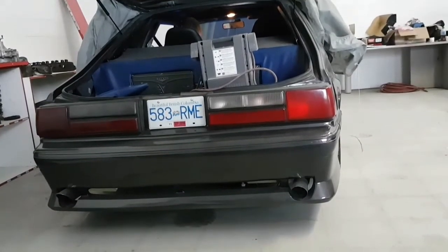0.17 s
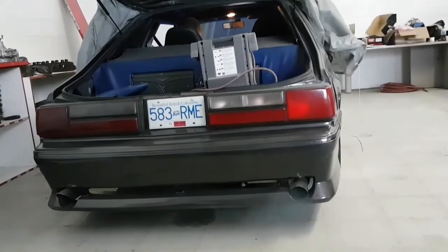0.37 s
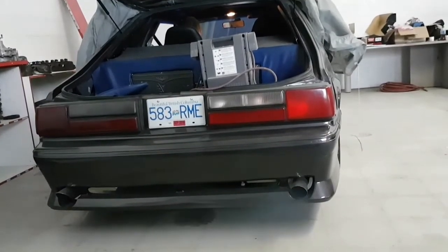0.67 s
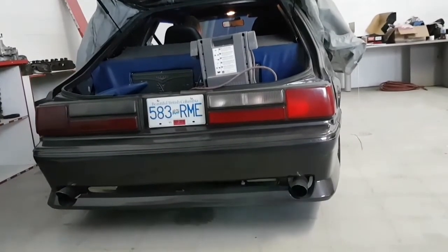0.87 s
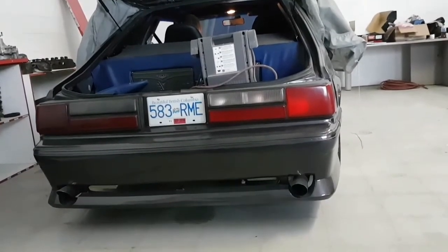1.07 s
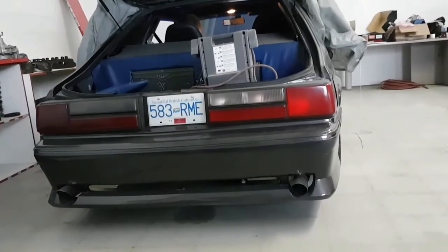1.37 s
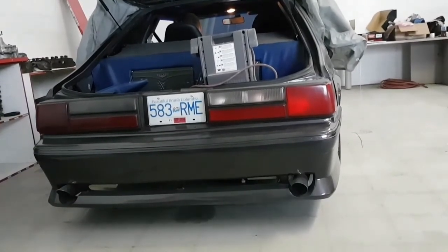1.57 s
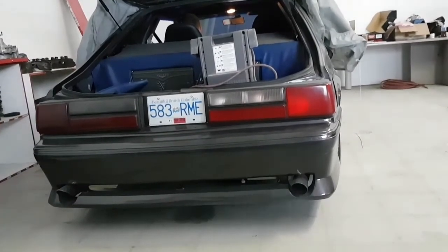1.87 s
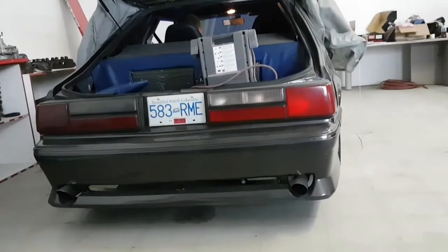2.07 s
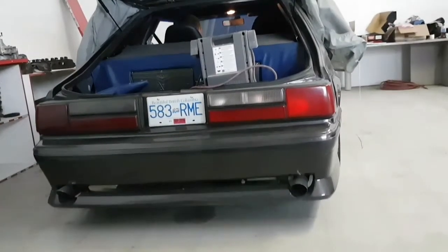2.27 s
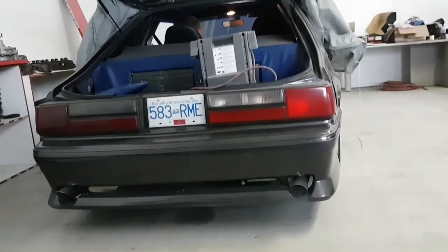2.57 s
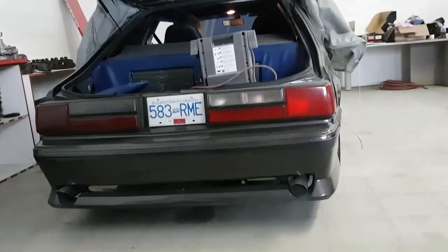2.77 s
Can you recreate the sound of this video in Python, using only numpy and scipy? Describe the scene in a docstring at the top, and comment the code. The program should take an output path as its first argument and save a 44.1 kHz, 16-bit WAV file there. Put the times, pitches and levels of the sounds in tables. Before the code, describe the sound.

V8 car exhaust rumbling at idle in a workshop, one quick throttle blip with belt chirps, then falling back

```python
"""A V8 with twin tailpipes idles in a workshop, heard in stereo from behind; one throttle blip, then a lumpy idle.
Uneven firing pulses and clean engine orders ring the pipes (a deep boom, a bark under load); gas rasps and hisses.
The boom comes almost wholly direct to the microphones; bark, rasp and belt bring more of the room with them.
The throttle opens with a short hiss, the belt chirps around the pick-up, and the running gear whirrs
over the engine bay's steady rush, made of noise bands."""
import sys
import numpy as np
from scipy import signal
from scipy.io import wavfile
from scipy.ndimage import uniform_filter1d

SR = 44100
rng = np.random.default_rng(int(sys.argv[2]) if len(sys.argv) > 2 else 0)


def master_out(mix):
    """Clip the mix to full scale and print it as 16-bit PCM to the path in sys.argv[1]."""
    frames = np.transpose(np.atleast_2d(mix))
    ceiling = np.clip(frames, -1, 1)
    pcm = np.round(ceiling * 32767).astype(np.int16)
    wavfile.write(sys.argv[1], SR, pcm)


N = 129213
T = np.arange(N) / SR   # time, s

# In mode tables, width is that of one of two equal stages and level is relative within the group.
# Level curves are followed over time, with the trim (_TRIM_DB) added.

# engine speed: [t/s, four-stroke cycles per s]
ENGINE_SPEED = [(0, 13.86), (.2, 12.36), (.42, 12.34), (.5, 12.5), (.57, 16.6), (.64, 22), (.72, 30),
                (.78, 33.9), (.83, 36.2), (.9, 34.1), (1.0, 32.2), (1.09, 29.8), (1.22, 28.6), (1.33, 27.6),
                (1.45, 23.7), (1.62, 21.9), (1.8, 19.3), (1.98, 15.5), (2.16, 14.7), (2.34, 13.1),
                (2.55, 12.47), (2.93, 10.17)]
# strength of each cylinder's pulse, in firing order: [level/dB]
CYLINDER_DB = [2, -0.5, -3.5, 1, -7, 1, -1, -2]
CYLINDERS = len(CYLINDER_DB)
FIRING_JITTER, FIRING_SPREAD_DB = 0.0064, 5   # standard deviations: share of a cycle, dB
# clean exhaust lines: [multiple of the cycle rate]
ORDER_MULTIPLE = [3, 4, 5, 6, 7, 8, 9, 10, 11, 12, 13, 16, 19, 21, 24, 27, 29, 32]
# their strength against the firing pulses: [level/dB]
ORDER_DB = [-0.5, -5, 0.5, 0.5, -4, 0, -5, -3.5, -4.5, -1.5, -9.5, -12, -6.5, -7.5, -8, -5.5, -10, -10.5]
ORDER_WAVER_DB, WAVER_PER_S = 4.5, 12   # the upper lines swell and fade
BOOM_CLEAN, BARK_CLEAN, RASP_CLEAN = 2, 1.53, 0.17   # gain of clean lines against the pulses

# deep boom of the pipes: [t/s, level/dB]
BOOM_LEVEL = [(0.0, -5), (0.09, -17.5), (0.11, -8.5), (0.18, -15), (0.5, -9.5), (0.57, -5.5), (0.63, -17),
              (0.75, -34), (0.97, -14), (1.16, -10), (1.21, -26), (1.24, -11.5), (1.34, -7), (1.36, -11.5),
              (1.49, -7), (1.53, -14), (1.56, -12.5), (1.8, -5), (1.84, -14), (1.93, -8.5), (2.01, -14),
              (2.16, -9.5), (2.32, -12), (2.35, -5.5), (2.4, -15), (2.52, -9.5), (2.58, -20), (2.78, -13),
              (2.83, -26), (2.87, -10.5), (2.9, -19.5)]
# its wandering centre, as the exhaust lines pass through it: [t/s, f/Hz]
BOOM_CENTRE = [(0, 108.3), (.2, 105.2), (.33, 119.3), (.47, 108), (.56, 123), (.62, 134), (.85, 137.5),
               (1.1, 116.4), (1.331, 124), (1.45, 119), (1.62, 127.6), (1.8, 115.5), (1.93, 107.8),
               (2.03, 123.7), (2.16, 118.3), (2.34, 107), (2.5, 114.8), (2.7, 110.3), (2.93, 119.2)]
BOOM_WIDTH_HZ, BOOM_TRIM_DB = 16.1, -0.5
# thrum, the lowest pipe resonance: [f/Hz, width/Hz, level/dB]
THRUM_MODES = [(60, 51, 0)]
# its level curve: [t/s, level/dB]
THRUM_LEVEL = [(0.0, -30), (0.22, -42), (0.69, -25), (0.77, -42), (0.99, -34), (1.01, -47), (1.48, -27.5),
               (1.78, -42), (1.84, -37), (2.2, -29), (2.24, -45), (2.93, -34.5)]
# drone just above the boom: [f/Hz, width/Hz, level/dB]
DRONE_MODES = [(140.1, 28.6, 3), (163.6, 88, -17.5)]
# its level curve: [t/s, level/dB]
DRONE_LEVEL = [(0.0, -17.5), (0.129, -49), (0.54, -17), (0.6, -10.5), (0.631, -14), (0.87, -12),
               (0.95, -23), (1.18, -18), (1.72, -48.5), (1.949, -18.5), (2.081, -22.5), (2.88, -35.5)]
THRUM_TRIM_DB, DRONE_TRIM_DB = 2, -1.5
# growl under the bark: [f/Hz, width/Hz, level/dB]
GROWL_MODES = [(226.6, 21.9, 0)]
# its level curve: [t/s, level/dB]
GROWL_LEVEL = [(0.0, -28.5), (0.049, -25.5), (0.15, -33.5), (0.18, -31), (0.56, -22), (0.73, -22.5),
               (0.8, -43), (0.901, -16), (1.238, -14.5), (1.31, -24.5), (1.58, -20), (1.631, -25),
               (1.68, -21), (1.84, -26.5), (2.07, -17.5), (2.119, -29), (2.85, -26), (2.88, -33.5)]
# bark: [f/Hz, width/Hz, level/dB]
BARK_MODES = [(265, 37.7, 0)]
# its level curve: [t/s, level/dB]
BARK_LEVEL = [(0.0, -35.5), (0.4, -27), (0.47, -38), (0.5, -23.5), (0.8, -6), (0.85, -18), (1.0, -14),
              (1.04, -20.5), (1.72, -25), (1.75, -36.5), (1.85, -20.5), (2.23, -39), (2.52, -32.5),
              (2.55, -31), (2.64, -25.5), (2.68, -32), (2.77, -30), (2.93, -40)]
# honk above the bark, which speaks under load: [t/s, level/dB]
HONK_LEVEL = [(0.0, -37), (0.031, -43.5), (0.501, -34), (0.66, -11.5), (0.749, -18.5), (0.849, -14),
              (1.599, -32), (2.84, -47.5), (2.88, -47)]
# its moving centre: [t/s, f/Hz]
HONK_CENTRE = [(.6, 369.4), (.68, 389), (.88, 400), (1.03, 377.9), (1.12, 362), (1.4, 385.2)]
GROWL_TRIM_DB, BARK_TRIM_DB, HONK_TRIM_DB, HONK_WIDTH_HZ = 3.5, 2.5, 0.5, 37.3

# gas from the tailpipes: [t/s, rasp level/dB, hiss level/dB before trim]
GAS_LEVELS = [(0.0, -33, -47), (0.35, -33.5, -46.5), (0.46, -35, -40), (0.51, -27, -42), (0.71, -17, -33),
              (1.12, -20, -37), (1.15, -27, -36.5), (1.17, -20, -38.5), (1.3, -23, -37), (1.7, -27.5, -42),
              (1.79, -31.5, -43.5), (1.82, -27.5, -43), (2.41, -36.5, -47), (2.75, -30.5, -48.5),
              (2.89, -34, -51), (2.9, -33.5, -50)]
# upper pipe modes rung by the firings: [f/Hz, width/Hz, level/dB]
RASP_MODES = [(446.9, 24, 7), (500, 54, 4), (567.2, 19.6, 9.5), (622.4, 37, 1.5), (686.5, 45, 1),
              (756.4, 36, -4.5), (857, 70, -6.5), (995, 210, -11)]
# colour of the rasp's noise: [f/Hz, relative level/dB per Hz]
RASP_SPECTRUM = [(250, -14.5), (450, -8), (600, -3.5), (850, -1.5), (1200, -10), (1700, -9), (2400, -36),
                 (4000, -57.5)]
# colour of the hiss: [f/Hz, relative level/dB per Hz]
HISS_SPECTRUM = [(900, 6.5), (1500, 2.5), (2200, 2), (2900, -3.5), (3900, -3), (5000, -11), (6500, -11.5),
                 (8500, -36), (11000, -22.5), (13000, -41.5)]
PUFF_S, PUFF_DEPTH = 0.011, 0.4   # decay time of a puff; share of the rasp noise that it chops
RASP_RING_DB, RASP_NOISE_DB, HISS_TRIM_DB = 0.5, -6, 4.5

# tailpipes blaring while the throttle is open: [f/Hz, width/Hz, level/dB]
BLARE_MODES = [(724, 69, -1), (904, 58, 3.5), (1180, 220, -17.5)]
BLARE_S, BLARE_LENGTH_S, BLARE_DB = 0.714, 0.11, -21
# belt chirps: [centre t/s, length/s, f/Hz, level/dB of the upper tone]
CHIRPS = [(0.459, .026, 2000, -29), (0.532, 0.015, 1860, -24.5), (0.535, 0.028, 1980, -29),
          (0.588, 0.0066, 2120, -24.5), (0.602, 0.02, 1980, -26), (0.645, 0.02, 2093, -22),
          (0.712, 0.026, 2140, -30.5), (0.682, 0.0097, 2156, -23.5), (0.74, .01, 2306, -21),
          (0.771, 0.0064, 2284, -23.5), (0.82, 0.011, 2070, -23.5), (0.983, .17, 2037, -35.5)]
CHIRP_WIDTH_HZ, CHIRP_LOWER_RATIO, CHIRP_LOWER_DB = 160, 0.928, -7.5
THROTTLE_S, THROTTLE_LENGTH_S, THROTTLE_DB = 0.412, 0.023, -40
THROTTLE_HZ, THROTTLE_WIDTH_HZ = 6680, 560
THROTTLE_LEFT_DB = -3   # the right channel gets the opposite
# resonances of the engine's whirr: [f/Hz, width/Hz, level/dB]
WHIRR_MODES = [(968, 120, -0.5), (2053, 386, 3), (2243, 200, -3.5), (3796, 810, -6.5)]
WHIRR_DB, WHIRR_DB_PER_DOUBLING, IDLE_CYCLES_PER_S = -46, 3.5, 11.9
# colour of the engine bay's rush: [f/Hz, relative level/dB per Hz]
BAY_SPECTRUM = [(15, -57), (25, -28), (54, -15), (89, -25.5), (121, -5), (169, -13.5), (225, -10),
                (349, -13), (386, -25.5), (451, -29), (615, -32), (1560, -37), (2360, -41.5), (8360, -70.5),
                (12000, -117), (15600, -147), (22000, -120)]
BAY_DB = -24.5

# likeness of left and right in the noises: [f/Hz, correlation]
STEREO_LIKENESS = [(100, 0.87), (250, 1), (500, 0.28), (1000, 0), (2000, 0.013), (4000, 0), (12000, 0.066)]
# balance of the noises: [f/Hz, left minus right level/dB]
STEREO_BALANCE = [(100, -4), (1000, -0.5), (2000, 0.2), (4000, 0.5), (8000, 3.5), (12000, 21)]
# room sound against direct sound
ROOM_T60_S, BOOM_WET_DB, BARK_WET_DB, RASP_WET_DB, BELT_WET_DB = 0.43, -22.5, -12.5, -7.5, -0.5
CUTOFF_HZ, FADE_OUT_S = 14600, 0.0041


def firings(cycles):
    """One pulse per cylinder and cycle, each cylinder with its own strength, no two firings alike."""
    chance = rng.standard_normal((700, 2))
    k = np.arange(int(cycles[-1] * CYLINDERS))
    times = np.interp(k / CYLINDERS + FIRING_JITTER * chance[k, 0], cycles, T)
    strength_db = np.resize(CYLINDER_DB, len(k)) + FIRING_SPREAD_DB * chance[k, 1]
    pulses = np.zeros(N)
    pulses[np.clip(times * SR, 0, N - 1).astype(int)] = from_db(strength_db)
    return pulses


def engine_orders(cycles, speed):
    """Multiples of the cycle rate as clean lines: all of them steady, and the upper ones wavering."""
    steady, upper = 0, 0
    pulse_scale = 2 * CYLINDERS * speed / SR   # a line's amplitude in a train of unit pulses
    for k, db in zip(ORDER_MULTIPLE, ORDER_DB):
        phase = 2 * np.pi * k * cycles + k * k   # staggered, so that the lines do not peak together
        line = from_db(db) * np.cos(phase) * pulse_scale
        steady = steady + line
        if k >= CYLINDERS - 1:
            upper = upper + line * from_db(ORDER_WAVER_DB * drift(WAVER_PER_S))
    return steady, upper


def exhaust_note(pulses, lines, upper):
    """Pulses and clean lines excite the pipe resonances, some of them with moving centres."""
    low = pulses + BOOM_CLEAN * lines
    high = pulses + BARK_CLEAN * upper
    boom = gliding(low, BOOM_CENTRE, BOOM_WIDTH_HZ, BOOM_LEVEL, BOOM_TRIM_DB)
    boom += voiced(low, THRUM_MODES, THRUM_LEVEL, THRUM_TRIM_DB)
    boom += voiced(low, DRONE_MODES, DRONE_LEVEL, DRONE_TRIM_DB)
    bark = voiced(high, GROWL_MODES, GROWL_LEVEL, GROWL_TRIM_DB)
    bark += voiced(high, BARK_MODES, BARK_LEVEL, BARK_TRIM_DB)
    bark += gliding(high, HONK_CENTRE, HONK_WIDTH_HZ, HONK_LEVEL, HONK_TRIM_DB)
    balance = from_db([[-.35], [.35]])   # left, right
    return workshop(boom, BOOM_WET_DB) * balance + workshop(bark, BARK_WET_DB)


def exhaust_gas(pulses, upper):
    """Each firing rings the upper pipe modes and lets out a puff of rasp and hiss."""
    rasp_db, hiss_db = in_time(GAS_LEVELS)
    puffs = signal.lfilter([1], [1, -np.exp(-1 / (PUFF_S * SR))], pulses + 1e-18)
    puffs = evened(puffs, 0.065)
    turbulence = 0.098 * puffs * rng.standard_normal(N)
    ring = evened(pipe(pulses + RASP_CLEAN * upper + turbulence, RASP_MODES), 0.024)
    chop = rms_one(1 - PUFF_DEPTH + PUFF_DEPTH * puffs)
    rasp = from_db(RASP_RING_DB) * workshop(ring, RASP_WET_DB)
    rasp = rasp + from_db(RASP_NOISE_DB) * chop * stereo_noise(RASP_SPECTRUM)
    hiss = rms_one(1 + 1.4 * puffs) * stereo_noise(HISS_SPECTRUM)
    return from_db(rasp_db) * rasp + from_db(hiss_db + HISS_TRIM_DB) * hiss


def blare(pulses):
    """Firings under load ring the tailpipes, in one bell-shaped swell."""
    ring = evened(pipe(pulses, BLARE_MODES), .04)
    return workshop(from_db(BLARE_DB) * swell(BLARE_S, BLARE_LENGTH_S) * ring, wet_db=-4)


def belt():
    """The drive belt's short two-toned squeals, each tone a narrow band of noise."""
    chirps = 0
    for s, length_s, hz, db in CHIRPS:
        upper_tone = whistle(hz, CHIRP_WIDTH_HZ)
        lower_tone = whistle(hz * CHIRP_LOWER_RATIO, 2 * CHIRP_WIDTH_HZ)
        squeal = upper_tone + from_db(CHIRP_LOWER_DB) * lower_tone
        chirps = chirps + from_db(db) * swell(s, length_s) * squeal
    return workshop(chirps, BELT_WET_DB)


def throttle():
    """Air whistles past the plate as it cracks open."""
    air = swell(THROTTLE_S, THROTTLE_LENGTH_S) * whistle(THROTTLE_HZ, THROTTLE_WIDTH_HZ)
    balance = from_db([[THROTTLE_LEFT_DB], [-THROTTLE_LEFT_DB]])
    return workshop(from_db(THROTTLE_DB) * air, wet_db=1.5) * balance


def whirr(speed):
    """The running gear rings a few broad resonances, louder with speed."""
    ring = evened(pipe(rng.standard_normal(N), WHIRR_MODES), .05)
    level_db = WHIRR_DB + WHIRR_DB_PER_DOUBLING * np.log2(speed / IDLE_CYCLES_PER_S)
    return workshop(ring * from_db(level_db), wet_db=1.5)


def engine_bay():
    """A steady rush of coloured noise in the background."""
    return from_db(BAY_DB) * stereo_noise(BAY_SPECTRUM)


def workshop(x, wet_db):
    """Direct sound plus a diffuse decaying tail, different at each ear; scaled to keep the power."""
    t = T[:SR // 2]
    tail = rng.standard_normal((2, len(t))) * from_db(-60 * t / ROOM_T60_S)
    tail *= t > .004   # the room answers after 4 ms
    tail /= np.sqrt(np.sum(tail ** 2, axis=1, keepdims=True))
    wet = from_db(wet_db)
    room = signal.fftconvolve(x[None], tail, axes=1)[:, :N]
    return (x + wet * room) / np.sqrt(1 + wet ** 2)


def voiced(source, modes, level, trim_db):
    """One group of pipe resonances, brought to its level curve."""
    return evened(pipe(source, modes), 0.099) * from_db(in_time(level)[0] + trim_db)


def gliding(source, centre, width_hz, level, trim_db):
    """A pipe resonance with a moving centre, brought to its level curve."""
    ring = moving_resonance(source, in_time(centre)[0], width_hz)
    return evened(ring, .04) * from_db(in_time(level)[0] + trim_db)


def pipe(x, modes):
    """Resonances side by side."""
    return sum(from_db(db) * resonance(x, hz, width) for hz, width, db in modes)


def resonance(x, hz, width_hz):
    """A steep resonance (a pole pair applied twice), gain near 1 on top."""
    r = np.exp(-np.pi * width_hz / SR)
    b = (1 - r * r) / 2 * np.array([1, 0, -1])
    a = [1, -2 * r * np.cos(2 * np.pi * hz / SR), r * r]
    return signal.lfilter(b, a, signal.lfilter(b, a, x + 1e-18))


def moving_resonance(x, hz, width_hz):
    """A steep resonance whose centre follows hz: shift down to 0 Hz, low-pass, shift back up."""
    turn = np.exp(2j * np.pi * np.cumsum(hz) / SR)
    r = np.exp(-np.pi * width_hz / SR)
    return np.real(turn * signal.lfilter([(1 - r) ** 2], [1, -2 * r, r * r], x / turn))


def whistle(hz, width_hz):
    """Noise in one narrow resonance, at an even level."""
    return evened(resonance(rng.standard_normal(N), hz, width_hz), 0.024)


def stereo_noise(spectrum):
    """Half-octave bands of noise, each with its own level, likeness and balance; overall rms 1."""
    out = 0
    edges = 22 * 2 ** (np.arange(20) / 2)
    white = rng.standard_normal((2, 2, N))   # neighbouring bands take different noises
    signs = np.array([[1], [-1]])   # left, right
    for k, (low, high) in enumerate(zip(edges, edges[1:])):
        hz = np.sqrt(low * high)
        if high > spectrum[0][0] and low < spectrum[-1][0]:
            band = signal.butter(2, [low, high], "band", fs=SR, output="sos")
            mid, side = signal.sosfilt(band, white[k % 2])
            alike = np.clip(at_hz(STEREO_LIKENESS, hz), -1, 1)
            gain = from_db(at_hz(spectrum, hz) + signs * at_hz(STEREO_BALANCE, hz) / 2)
            out = out + gain * (np.sqrt(1 + alike) * mid + np.sqrt(1 - alike) * side * signs)
    return rms_one(out)


def swell(s, length_s):
    """A bell-shaped envelope centred on s, down to exp(-2) at length_s to either side."""
    return np.exp(-2 * ((T - s) / length_s) ** 2)


def drift(rate):
    """Random values, rate of them a second, joined by straight lines; spread near 1."""
    return np.interp(T * rate, np.arange(200), rng.standard_normal(200))


def evened(x, window_s):
    """Hold the short-term rms near 1 (two running means of the power)."""
    width = int(window_s * SR)
    power = uniform_filter1d(uniform_filter1d(x * x, width), width)
    return x / np.sqrt(power + 1e-14)


def rms_one(x):
    """Scale to rms 1."""
    return x / np.sqrt(np.mean(x ** 2) + 1e-20)


def from_db(db):
    """Decibels to gain."""
    return 10 ** (np.asarray(db) / 20)


def in_time(rows):
    """Each column of a curve at every sample."""
    s, *columns = np.transpose(rows)
    return [np.interp(T, s, column) for column in columns]


def at_hz(points, hz):
    """Read a curve on a log-frequency axis."""
    table = np.array(points)
    return np.interp(np.log(hz), np.log(table[:, 0]), table[:, 1])


def scene():
    """Exhaust in front, the engine bay's steady rush behind it."""
    speed, = in_time(ENGINE_SPEED)
    cycles = np.cumsum(speed) / SR
    pulses = firings(cycles)
    lines, upper = engine_orders(cycles, speed)
    exhaust = exhaust_note(pulses, lines, upper) + exhaust_gas(pulses, upper) + blare(pulses)
    return exhaust + belt() + throttle() + whirr(speed) + engine_bay()


def record(dry):
    """The highest peaks are rounded off, the end fades briefly, and the top is cut."""
    rounded = dry / (1 + (dry / .95) ** 6) ** (1 / 6)
    fade = np.sin(np.pi / 2 * np.clip((T[-1] - T) / FADE_OUT_S, 0, 1)) ** 2
    top_cut = signal.cheby2(12, 70, CUTOFF_HZ, fs=SR, output="sos")
    return signal.sosfilt(top_cut, rounded * fade)


dry = scene()
out = record(dry)
master_out(out)
```